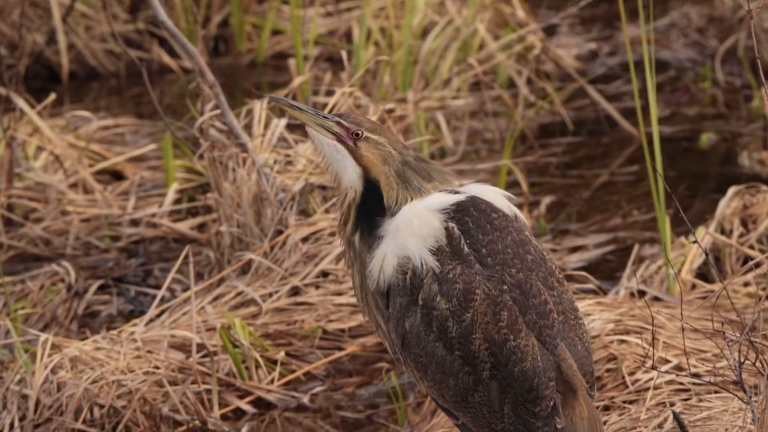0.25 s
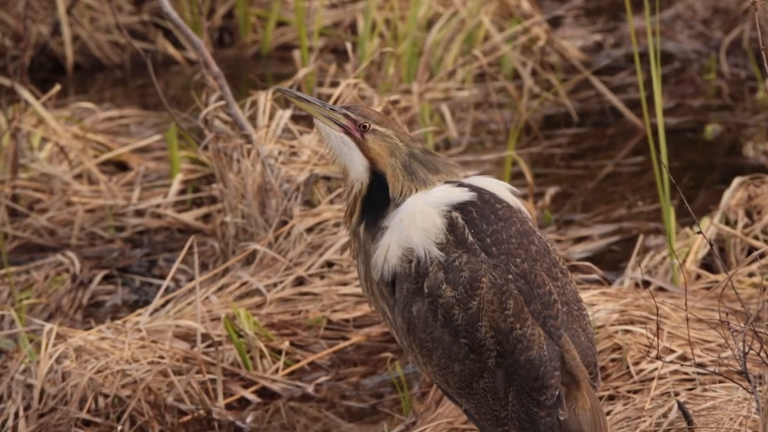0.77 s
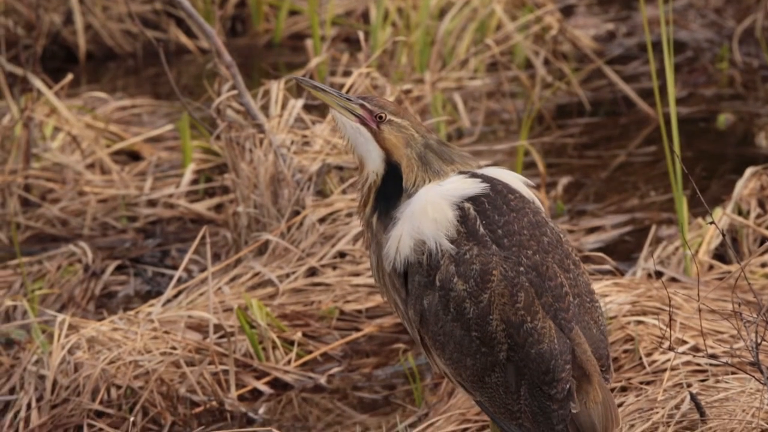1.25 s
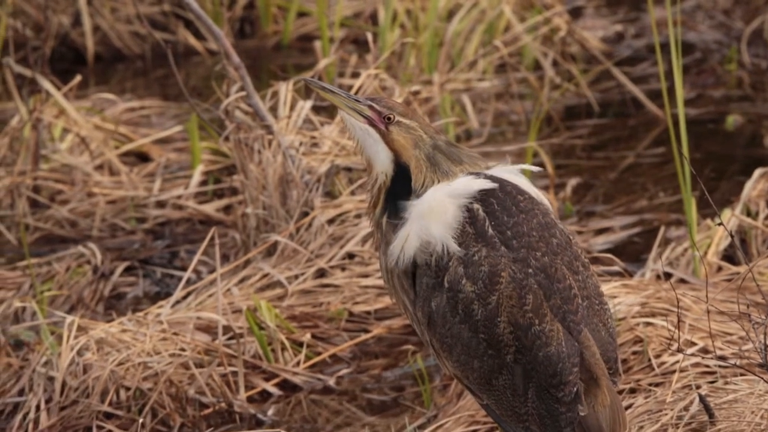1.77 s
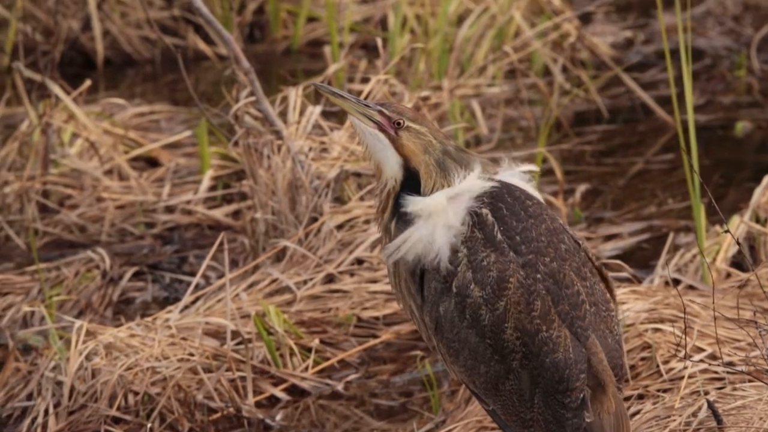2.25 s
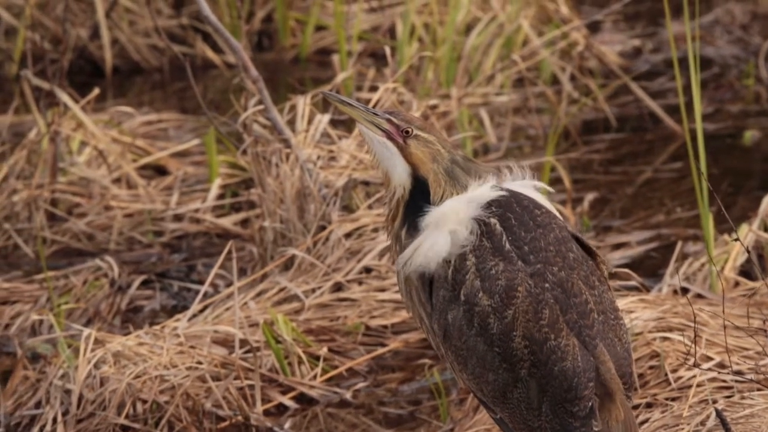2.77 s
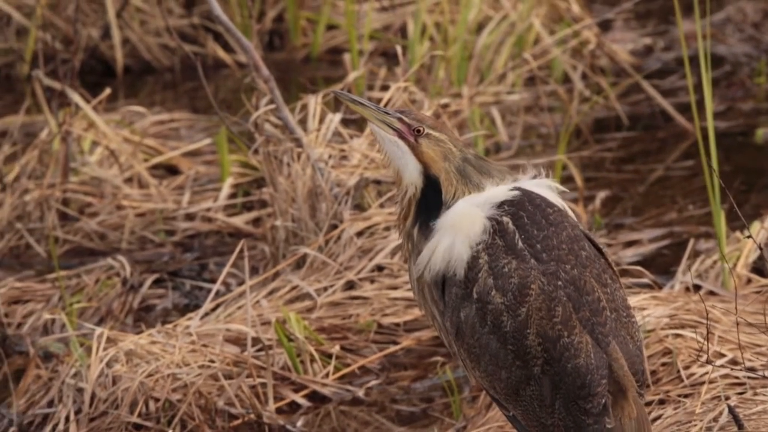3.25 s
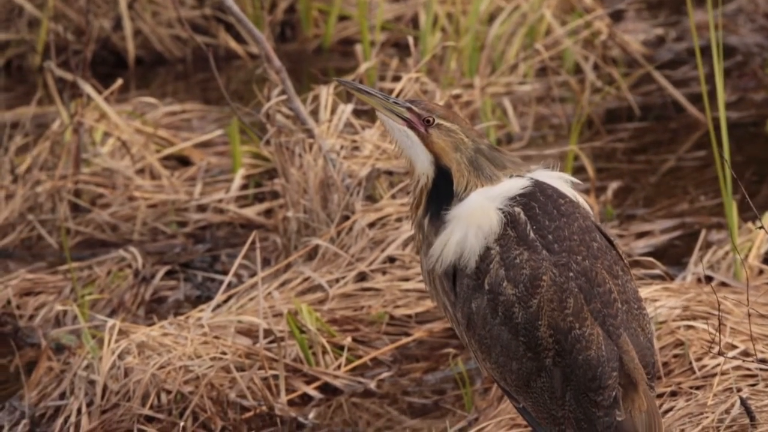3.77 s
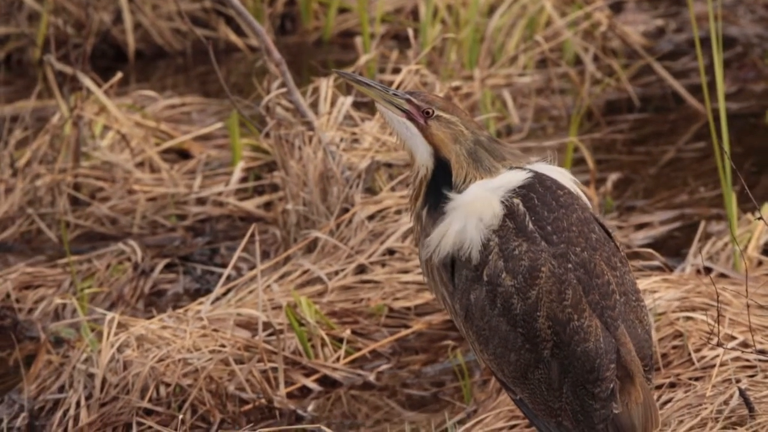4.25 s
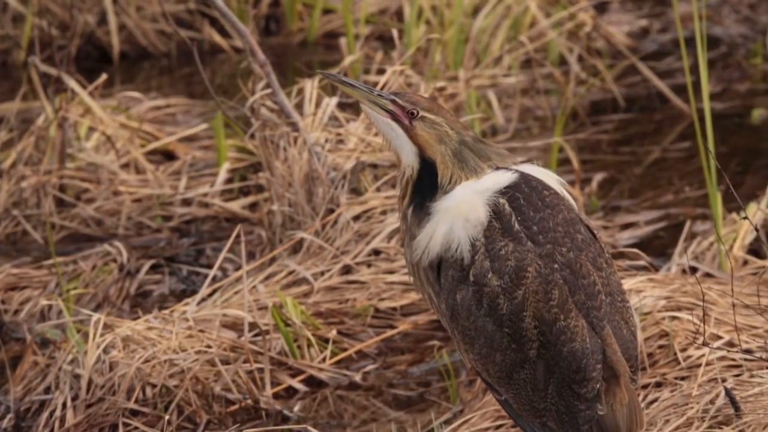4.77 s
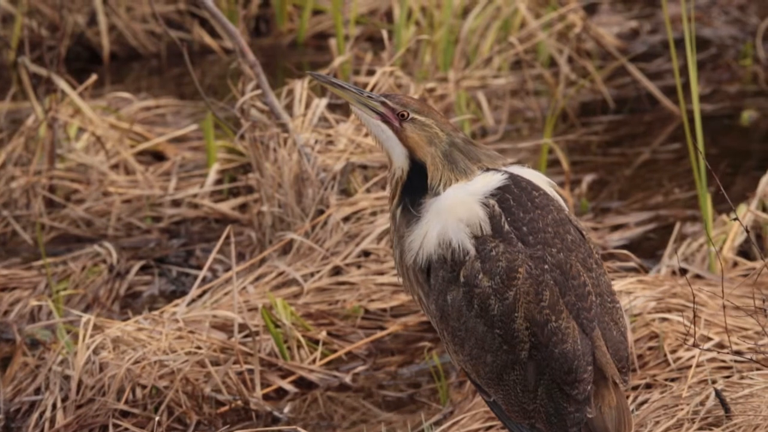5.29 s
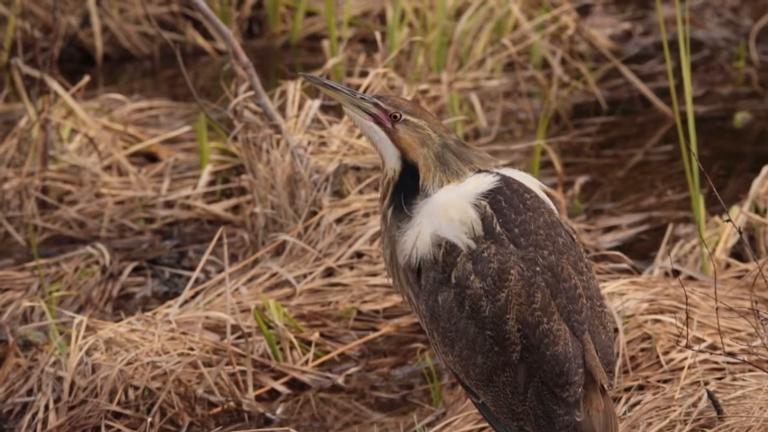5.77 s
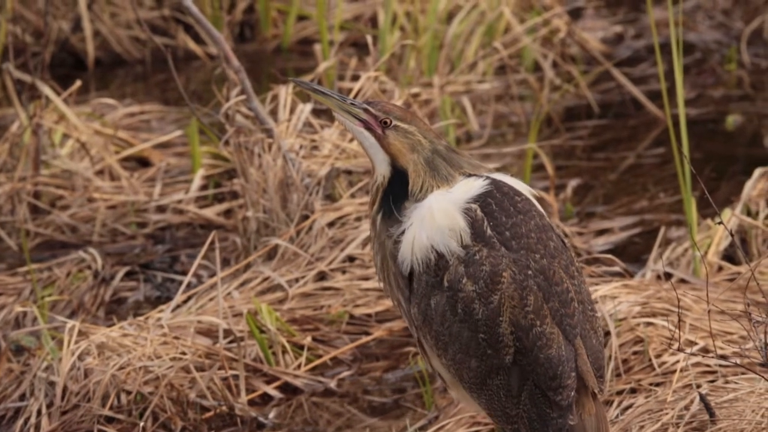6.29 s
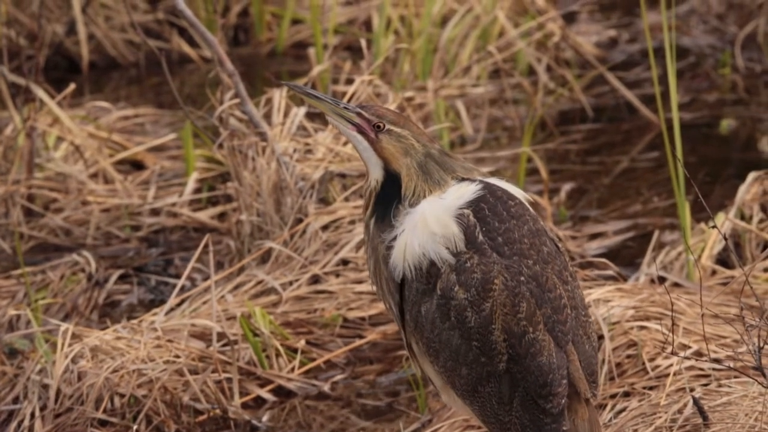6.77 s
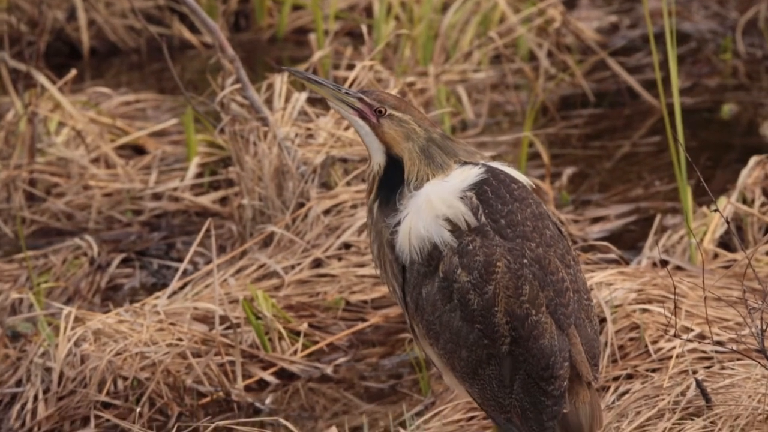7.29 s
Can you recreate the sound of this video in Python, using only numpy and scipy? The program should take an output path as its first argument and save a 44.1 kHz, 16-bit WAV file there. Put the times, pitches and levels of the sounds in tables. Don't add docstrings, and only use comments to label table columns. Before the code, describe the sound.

Outdoors in a marsh, deep gusts buffet the microphone from the start, fluttering and thumping, with a strong puff near 1.6 seconds, fading by about 3. Behind them runs a steady, high, shimmering chorus of many distant tree frogs, slightly fuller around 2.5 and near the end. One small frog close by peeps at about 1.0, 2.5, 3.8, 4.9, 6.0 and 7.0 seconds: short, bright, rising whistles that suddenly drop into a brief rough tail; the second is loudest, the fifth softest. From about 3 seconds a faint, low, throaty murmur swells and fades far away, stronger near 3.8 and 5.6. Wind stays low through the middle, with small puffs from 5.3, then rumbles again after 6, strongest around 6.5. A dull reed knock comes at 7.4. Quiet low air noise and soft even hiss lie beneath until the end at 7.5.

```python
import sys
import numpy as np
from scipy import signal
from scipy.fft import rfft, irfft, next_fast_len
from scipy.io import wavfile
from scipy.ndimage import uniform_filter1d

SR = 44100
rng = np.random.default_rng(int(sys.argv[2]) if len(sys.argv) > 2 else 0)


def wrap_up_sound(samples):
    columns = np.atleast_2d(samples).T
    tamed = np.clip(columns, -1, 1)
    steps = np.round(tamed * 32767).astype(np.int16)
    wavfile.write(sys.argv[1], SR, steps)


def amplitude_ratio(level_db):
    exponent = np.asarray(level_db, float) / 20
    return 10 ** exponent


N = 332236


def level(x, db):
    return x * amplitude_ratio(db) / np.sqrt(np.mean(x ** 2))


def curve(table):
    s, *columns = np.transpose(table)
    return [np.interp(np.arange(N) / SR, s, c) for c in columns]


def colour_db(hz, points):
    f, db = np.transpose(points)
    return np.interp(np.log(np.maximum(hz, 1)), np.log(f), db)


def noise(gain):
    size = next_fast_len(N)
    hz = np.arange(size // 2 + 1) * SR / size
    return irfft(rfft(rng.standard_normal(size)) * gain(hz), size)[:N]


def walk(rate):
    hold = int(SR / rate)
    steps = np.repeat(rng.standard_normal(N // hold + 1), hold)
    return level(uniform_filter1d(uniform_filter1d(steps, hold), hold)[:N], 0)


def bump(at, width):
    t = np.arange(0, N, 16) / SR
    return np.repeat(np.exp(-((t - at) / width) ** 2), 16)[:N]


def reeds(x, t60, wet_db):
    t = np.arange(SR // 2) / SR
    decay = np.exp(-np.log(1000) * t / t60)
    tail = rng.standard_normal(len(t)) * decay * np.minimum(t / 0.015, 1)
    return x + amplitude_ratio(wet_db) * signal.fftconvolve(x, tail / np.sqrt(np.sum(tail ** 2)))[:N]


# [f/Hz, level/dB]
BUFFET = [(11, -57), (18, -22.5), (52, -0.5), (102, 0.5), (168, -8), (209, -14.5), (379, -30), (540, -44.5),
          (700, -45), (910, -65), (1540, -120)]
# [t/s, strength level/dB, deep rumble of large eddies level/dB, flutter level/dB]
GUSTS = [(0.0, -46.5, -24, 1), (.2, -51, -4, 2.5), (.45, -39, -9, 1.5), (.85, -42.5, -12, -0.5),
         (1.4, -42.5, -7, 0.5), (1.72, -47, -7.5, 0), (2.15, -47, -3, 0.5), (2.5, -54, -6, 0.5),
         (2.8, -54.5, -0.5, -5.5), (3.0, -74, -1, 1.5), (3.6, -82, 0, 6), (3.8, -68, -1.5, -3),
         (4.3, -76, -3, 1.5), (4.9, -83.5, 0, 9), (5.5, -69.5, -3, -4), (6.0, -58, 4.5, -7),
         (6.5, -50, -10.5, -2), (7.53, -55.5, 0.5, -5.5)]
# [t/s, level over the wind/dB, width/s, flutter level/dB]
PUFFS = [(.42, 3, 0.015, -2), (.535, 5, 0.015, 2), (.71, -1, 0.052, 1), (.82, -3.5, 0.04, -4),
         (.88, 3.5, 0.089, 2.5), (1.07, 4.5, 0.018, 1.5), (1.17, 4.5, 0.02, -2.5), (1.28, -6, 0.036, 1.5),
         (1.38, 1, 0.022, 2.5), (1.5, 3, 0.044, -1), (1.6, 13, 0.041, -4.5), (1.76, 2, 0.01, -0.5),
         (1.82, 5, 0.034, 0), (1.97, 2, 0.047, 0), (2.05, 5.5, 0.035, 0), (2.27, -6.5, 0.041, -1.5),
         (2.33, 6.5, 0.02, -4), (2.62, 2, 0.046, -4), (2.85, -9, 0.028, -10), (3.06, 2, 0.026, 0),
         (5.28, 13.5, .04, -13), (5.6, 12.5, 0.026, -6), (5.89, 4, 0.033, 1), (6.25, 6, 0.053, -1),
         (6.34, 7, 0.02, -1.5), (6.8, 2.5, 0.08, 1), (6.885, -10, .02, 1), (7.03, 3.5, 0.046, 3.5),
         (7.3, -3, 0.097, 0)]


def wind():
    gust_db, deep_db, flutter_db = curve(GUSTS)
    puffs = np.array([bump(at, width) for at, _, width, _ in PUFFS])
    puff_db, shake_db = np.array(PUFFS)[:, [1, 3]].T @ puffs
    flutter_db = flutter_db + shake_db + 1.03 * walk(8)
    deep_db = deep_db - 0.43 * puff_db + 1.6 * walk(7)
    gust_db = gust_db + puff_db
    power = amplitude_ratio(2 * gust_db)
    deep_db = deep_db - np.average(deep_db, weights=power)
    flutter_db = flutter_db - np.average(flutter_db, weights=power)
    out, shove = 0, walk(11)
    for centre_hz in 20 * 2 ** np.arange(0, 5.3, 1 / 3):
        def band(f):
            octaves = np.log2(np.maximum(f, 1) / centre_hz)
            return amplitude_ratio(colour_db(f, BUFFET)) * np.exp(-(octaves * 4) ** 2)
        eddy = noise(band)
        deep = np.clip(np.log2(70 / centre_hz), 0, 1)
        high = np.clip(np.log2(centre_hz / 100) * 1.6, 0, 1.4)
        tilt_db = deep * deep_db + high * flutter_db
        out = out + eddy * amplitude_ratio(tilt_db + 0.36 * shove + 0.84 * walk(6))
    return level(out, 1.0) * amplitude_ratio(gust_db)


# [t/s, level/dB]
CHORUS = [
    (0.0, -66.5),
    (1.7, -65),
    (2.03, -66.5),
    (2.54, -64),
    (3.46, -66),
    (4.4, -67),
    (5.28, -66),
    (7.07, -65),
    (7.53, -65.5),
]


def chorus(count=600):
    out = np.zeros(N + SR)
    for start, pitch, size, length in rng.random((count, 4)):
        u = np.linspace(0, 1, int(SR * (.1 + 0.069 * length)))
        hz = (2480 + 330 * pitch) * (1 + .12 * (np.sin(2.1 * u) - .45))
        envelope = amplitude_ratio(3.3 * size) * np.sin(np.pi * u) ** 1.3
        i = int(start * (N + SR // 2))
        out[i:i + len(u)] += envelope * np.sin(2 * np.pi * np.cumsum(hz) / SR)
    near = level(reeds(out[SR // 4:][:N], 0.58, 1.4), 0)

    def crowd(f):
        return 1 / (1 + ((f - 2700) / 260) ** 4) + 0.098 / (1 + ((f - 2250) / 250) ** 4)
    blur = level(noise(crowd), 0.53)
    return level(near + blur, 0) * amplitude_ratio(curve(CHORUS)[0] - 1.5 + 0.96 * walk(4.79))


# [f/Hz, level/dB]
AIR = [(15, -19), (25, -0.5), (86, -10), (186, -6), (224, -4.5), (302, -3), (344, -7.5), (593, -6.5),
       (1280, -14.5), (2200, -18), (2860, -36), (4840, -120)]


def air(db):
    return level(noise(lambda f: amplitude_ratio(colour_db(f, AIR))), db)


# [f/Hz, level/dB]
HISS = [(200, -5), (1000, 0.5), (3500, 0.5), (8000, -1), (12000, -1), (16000, -1), (20000, -4)]


def hiss():
    return level(noise(lambda f: amplitude_ratio(colour_db(f, HISS))), -66)


def peep_shape(start, length, db, scoop, last_hz):
    first_hz = 1236 + 4600 * scoop
    top = 1398 + 6.2 * start
    below = first_hz - min(24000 * scoop, 190)
    mid = first_hz + (.72 - .045 * start) * (top - first_hz)
    drop_hz, drop_s = 1040, .011
    knee_db, tail_db = db - 7, db - 8.5
    knee = start + length
    low = knee + drop_s
    tail = .028 + .00007 * (drop_hz - last_hz)
    return [(start - scoop - .003, below - 30, db - 21, .1),
            (start - scoop, below, db - 6, 0),
            (start - .2 * scoop, first_hz - 50, db - 6, 0),
            (start + .002, first_hz, db, 0),
            (start + .42 * length, mid, db - 3, 0),
            (start + .7 * length, top, db, 0),
            (start + .88 * length, top, db - 4, 0),
            (knee, top - 60, knee_db, 0),
            (low, drop_hz, knee_db + 2, .08),
            (low + .2 * tail, drop_hz - 15, knee_db, .25),
            (low + .45 * tail, .65 * drop_hz + .35 * last_hz, tail_db, .4),
            (low + .85 * tail, last_hz, tail_db + 1, .4),
            (low + tail + .003, last_hz, db - 24, .5)]


# [t/s, length to the drop/s, level/dB, scoop before the note/s, last pulse rate f/Hz]
PEEPS = [
    (.983, .107, -54, .003, 950),
    (2.515, .103, -51.5, .014, 800),
    (3.773, .125, -52.5, .006, 860),
    (4.934, .125, -52.5, .002, 960),
    (5.984, .127, -56, .004, 750),
    (6.982, .121, -54.5, .002, 730),
]
# [f/Hz, level/dB]
SAC = [(900, -32), (1250, -28), (1450, -22), (1750, -24), (2050, -12), (2400, 0), (2900, 0), (3100, -3),
       (3330, -18), (3580, -11), (3780, -26), (4300, -42), (5500, -50)]


def frog():
    out, shake, flutter = np.zeros(N), walk(200), walk(120)
    for row in PEEPS:
        peep = peep_shape(*row)
        hz, db, rough = curve(peep)
        on = slice(int(peep[0][0] * SR), int(peep[-1][0] * SR))
        db, rough = db[on], rough[on]
        hz = uniform_filter1d(hz, SR // 250)[on] * (1 + 0.106 * rough * shake[on])
        phase = 2 * np.pi * np.cumsum(hz) / SR
        fundamental_db = -7 + 1.7 * row[0]
        voice = 0
        for k in range(1, 6):
            harmonic_db = colour_db(k * hz, SAC) + (k == 1) * fundamental_db
            voice = voice + amplitude_ratio(harmonic_db) * np.sin(k * phase) / max(k - 2, 1)
        voice = voice * (1 + np.clip(rough - .15, 0, 1) * np.sin(phase / 2))
        level_db = db + (.3 + 9 * rough) * flutter[on] - 7 * rough
        out[on] += np.sqrt(2) * amplitude_ratio(level_db) * voice
    return reeds(out, .12, -24)


# [t/s at the middle, width/s, level/dB]
MURMUR = [
    (3.17, 0.046, -72),
    (3.5, 0.18, -75.5),
    (3.78, 0.13, -71.5),
    (4.7, 0.36, -75.5),
    (5.56, 0.13, -71),
    (5.88, 0.37, -74),
    (6.47, .05, -85),
    (6.95, 0.22, -74),
    (7.43, .04, -67),
]


def murmur():
    swell = sum(amplitude_ratio(db) * bump(at, width) for at, width, db in MURMUR)
    throat = level(noise(lambda f: 1 / (1 + ((f - 300) / 38) ** 2)), 0)
    return throat * swell * amplitude_ratio(walk(13))


def tick():
    t = np.maximum(np.arange(N) / SR - 7.412, 0)
    modes = sum(np.sin(2 * np.pi * hz * t) for hz in (320, 680, 1300))
    return amplitude_ratio(-63) * np.exp(-np.log(1000) * t / .035) * modes


def scene():
    air_db = -73
    side = air(air_db - 4.5)
    middle = wind() + chorus() + air(air_db) + frog() + murmur() + tick()
    return middle + np.array([side, -side])


def roll_off(x):
    return signal.sosfilt(signal.butter(12, 15760, fs=SR, output="sos"), x)


def record(dry):
    mix = dry + np.array([hiss() for _ in dry])
    return roll_off(mix)


dry = scene()
out = record(dry)
wrap_up_sound(out)
```